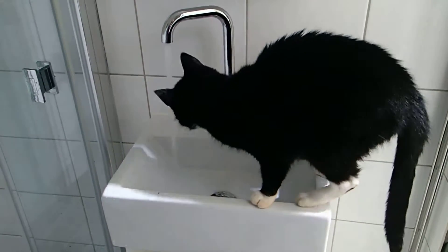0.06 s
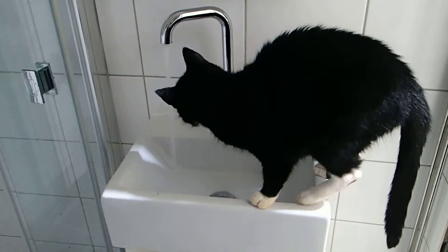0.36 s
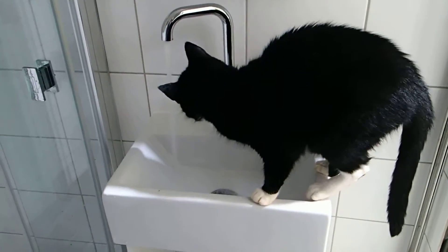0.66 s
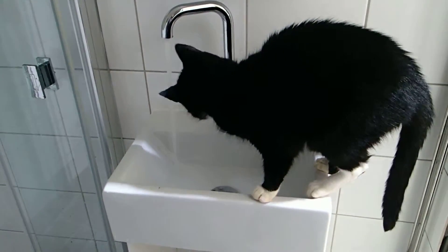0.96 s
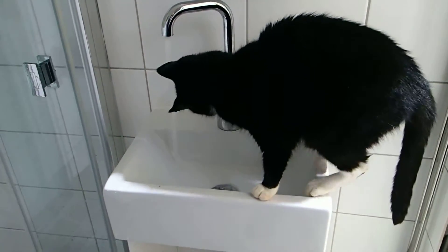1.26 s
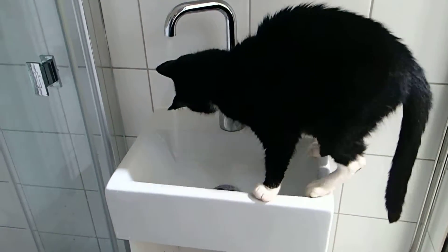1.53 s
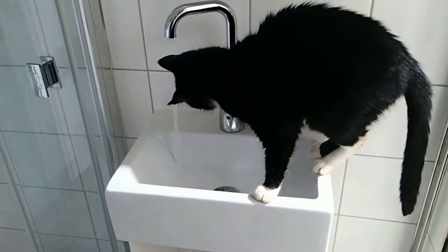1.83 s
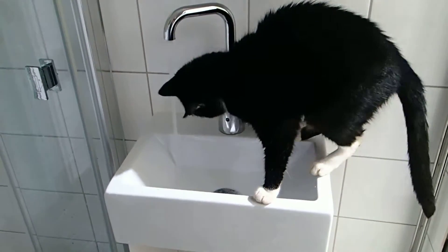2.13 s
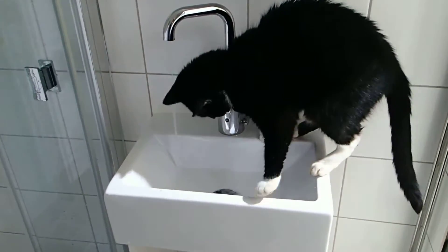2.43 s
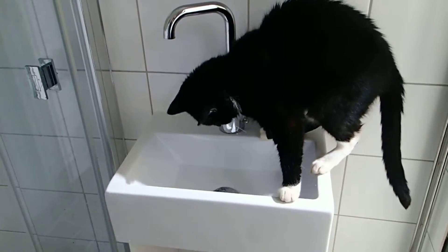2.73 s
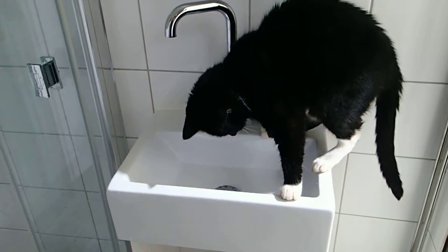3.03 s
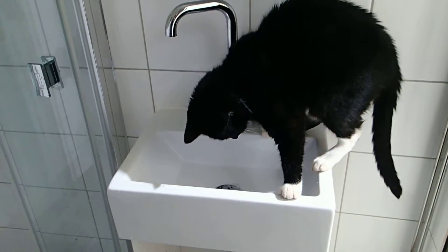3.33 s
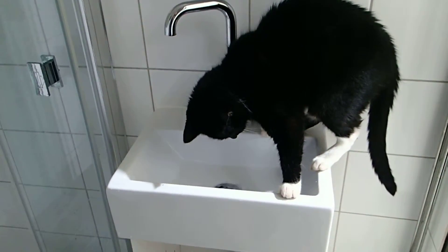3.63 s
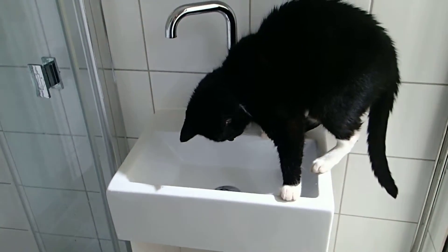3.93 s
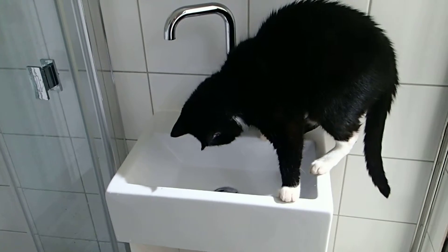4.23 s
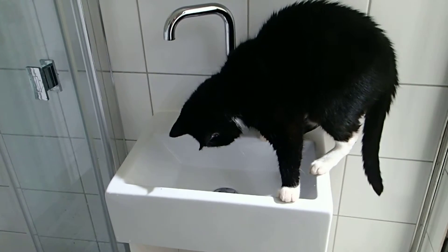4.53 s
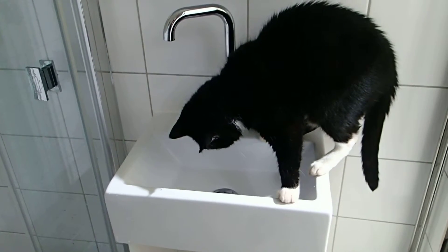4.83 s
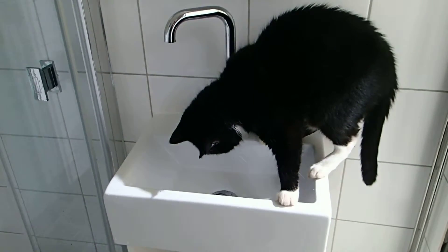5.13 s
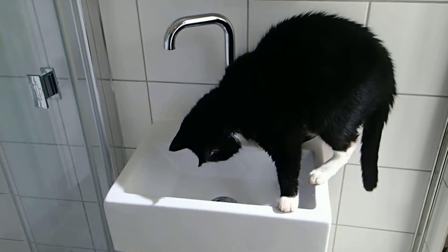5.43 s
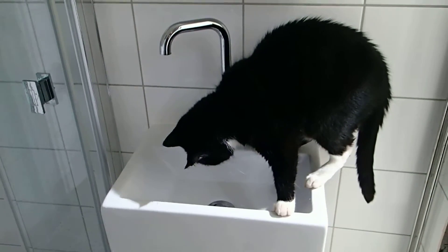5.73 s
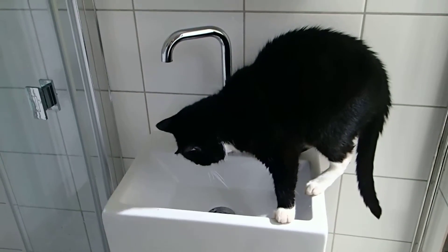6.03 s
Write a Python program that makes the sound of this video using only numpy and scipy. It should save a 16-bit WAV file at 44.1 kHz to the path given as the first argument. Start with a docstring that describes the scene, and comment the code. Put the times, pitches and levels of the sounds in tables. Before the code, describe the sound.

In a small tiled bathroom, a nearby faucet sprays and spits into a basin, over a couple of barely audible paw bumps. The valve closes with a low thud before the halfway point and the water cuts off. What remains is much quieter: a faint hollow gulp from the drain, foam popping, a few drops ringing on porcelain and some light ticks near the end.

```python
"""Bathroom tap, shut off

An aerated jet spatters and spits into a small porcelain basin in a tiled bathroom, while a cat's
paws bump softly on the rim. The valve shuts with a dull thud and the stream dies. Foam pops and
crackles as the last water slips down the hollow drain, and a few drops ring the basin."""
import sys
import numpy as np
from scipy import signal
from scipy.fft import rfft, irfft, next_fast_len
from scipy.io import wavfile

SR = 44100
rng = np.random.default_rng(int(sys.argv[2]) if len(sys.argv) > 2 else 0)


def unload_wav(signal):
    """Save mono or channel-first audio to the path in sys.argv[1] as 16-bit WAV at rate SR, clipped to [-1, 1]."""
    wavfile.write(
        sys.argv[1],
        SR,
        np.round(np.clip(np.atleast_2d(signal).T, -1, 1) * 32767).astype(np.int16),
    )


N = 268128
TIME = np.arange(N) / SR
FFT_SIZE = next_fast_len(N + SR)
FREQS = np.maximum(np.arange(FFT_SIZE // 2 + 1) * SR / FFT_SIZE, 1)
CLOSING_S, SHUT_S = 2.34, 2.498  # the valve starts to throttle, then seats

# Sources are built as mid/side pairs. Table levels are relative: each layer adds its own gain.
# Tone of water spattering on porcelain: freq_hz, level_db
SPATTER_EQ = [(1500, -31.5), (2300, -24.5), (3000, -18), (3400, -18.5), (4300, -12.5), (5100, -9.5),
              (6250, 1), (6900, -1.5), (8000, -0.5), (8700, -4.5), (10200, -8), (13000, -5), (14200, -10.5),
              (15500, -15)]
# Air pockets spitting in the jet at set moments: start_s, level_db
AIR_SPITS = [(0.063, -5), (0.174, -1.5), (0.194, -8), (0.2451, -4), (0.33, -17), (0.404, -5), (0.64, -8),
             (0.9296, -7), (1.4441, -0.5), (1.559, 0), (1.748, -9), (1.8513, -11), (1.918, -10),
             (2.0413, -7), (2.0792, -6), (2.3966, -16)]
def jet(level_db=-1.16, impact_db=-4.0, flutter_db=1.76, snap_db=-13.0, spit_db=9.0, wobble_db=0.56):
    """Tiny impacts and bursting bubbles come in flurries; droplets snap and air pockets spit on top."""
    flow_db = flow_level() + wobble_db * drift(per_s=10.9)
    bursting = fizz(per_s=8000, spread_db=4.0, width_hz=1270)
    impacts = from_db(impact_db) * grains(per_s=7400, spread_db=6.5)
    flutter = from_db(flutter_db * np.clip(drift(per_s=170), -2, 2))
    flurries = unit_rms((bursting + impacts) * flutter)
    snaps = from_db(snap_db) * grains(per_s=40, spread_db=1.9)
    out = (flurries + snaps) * from_db(flow_db + level_db)
    envelope = burst(rise_s=0.014, t60_s=0.032, count=SR // 25)
    for s, db in AIR_SPITS + chance_spits():
        spit = grains(per_s=10000, spread_db=-1.0, count=len(envelope)) * envelope
        add(out, s, from_db(db + spit_db) * unit_energy(spit))
    low_cut = signal.butter(2, 190, "high", fs=SR, output="sos")
    return signal.sosfilt(low_cut, coloured(out, SPATTER_EQ))

def flow_level(open_db=-21, thin_s=1.97, thin_db=4.5, closing_db_per_s=33, shut_db_per_s=327):
    """Level of the stream in dB: steady, briefly thinner, throttled, then shut."""
    thinning = thin_db * np.exp(-((TIME - thin_s) / 0.043) ** 2)
    closing = closing_db_per_s * np.clip(TIME - CLOSING_S, 0, 1)
    shut = shut_db_per_s * np.clip(TIME - SHUT_S, 0, 1)
    return open_db - thinning - closing - shut

def fizz(per_s, spread_db, width_hz):
    """Tiny bubbles burst all over the treble, each ringing a few cycles at one of many pitches."""
    out, bursts = 0, grains(per_s, spread_db)
    pitches_hz = np.linspace(1500, 15500, num=18)
    pitch_index = rng.integers(len(pitches_hz), size=N)
    for k, hz in enumerate(pitches_hz):
        resonance = signal.iirpeak(hz, hz / width_hz, fs=SR)
        out = out + signal.lfilter(*resonance, bursts * (pitch_index == k) + 1e-18)
    return unit_rms(out)

def chance_spits(level_db=-11.0, range_db=4.0, count=20):
    """More air pockets spit at loose intervals while the tap is open: start_s, level_db."""
    return [((k + jitter) / count * CLOSING_S, level_db + range_db * size)
            for k, (jitter, size) in enumerate(rng.random((count, 2)))]

# Prominent bubbles trapped under the jet: start_s, level_db, pitch_hz
ACCENT_BUBBLES = [(0.046, -20.5, 3016), (0.46, -25, 2920), (1.1063, -22, 2910), (1.5374, -24, 3560),
                  (1.8518, -22, 2620), (2.021, -26, 3000)]
def bubbles(level_db=-2.0, t60_s=0.025, rise_per_s=2.6):
    """Trapped bubbles chirp briefly, rising in pitch as they near the surface."""
    out, t = np.zeros((2, N)), TIME[:SR // 15]
    medium = chance_bubbles(level_db=-11.0, low_hz=2670, high_hz=3400, count=16)
    faint = chance_bubbles(level_db=-15.0, low_hz=2400, high_hz=5460, count=100)
    for s, db, hz in ACCENT_BUBBLES + medium + faint:
        chirp = np.sin(2 * np.pi * hz * t * (1 + rise_per_s * t / 2)) * fade(t60_s, len(t))
        add(out, s, from_db(db + level_db) * chirp)
    return out

def chance_bubbles(level_db, low_hz, high_hz, count, range_db=6.0):
    """Scattered bubbles, as loud as the flow is strong: start_s, level_db, pitch_hz."""
    jitter, size, pitch = rng.random((count, 3)).T
    start_s = (np.arange(count) + jitter) / count * SHUT_S
    db = np.interp(start_s, TIME, flow_level()) + level_db + range_db * size
    return list(zip(start_s, db, low_hz * (high_hz / low_hz) ** pitch))

# Ringing modes of the porcelain: pitch_hz, level_db, t60_s
BASIN_MODES = [(1710, -5.5, 0.059), (2750, -1.5, 0.028), (3530, -5, 0.051), (4300, 1, .03),
               (5800, -10, .03), (6130, -3, 0.027), (7200, 4.5, 0.028), (7820, 2, 0.024)]
# Tone of a drop's splash: freq_hz, level_db
SPLASH_EQ = [(30, -16), (120, 0), (400, -8), (700, 0.5), (1200, -9.5), (2500, -10.5), (5000, 1), (7200, 6),
             (10000, -5.5), (13500, -12), (15500, -18)]
# Drops hitting the basin: start_s, splash_db, ring_db, knock_db, treble_db
DROP_HITS = [(3.433, -21.5, -24.5, -43.5, -4), (3.713, -27.5, -50, -47.5, 8), (5.722, -30, -26.5, -57, 2)]
def drops(ring_gain_db=11.5, splash_gain_db=18.0, knock_gain_db=31.5):
    """A drop splashes, sets the porcelain ringing and knocks the hollow of the bowl."""
    out, splashes = np.zeros((2, N)), np.zeros((2, N))
    treble = signal.butter(2, 9000, "high", fs=SR, output="sos")
    knock = unit_energy(ring(hz=426, t60_s=0.024) * attack(0.012))
    envelope = burst(rise_s=0.006, t60_s=0.025, count=SR // 10)
    for s, splash_db, ring_db, knock_db, treble_db in DROP_HITS:
        modes = sum(from_db(db + rng.standard_normal((2, 1))) * ring(hz, t60_s)
                    for hz, db, t60_s in BASIN_MODES)
        add(out, s, from_db(ring_db + ring_gain_db) * unit_energy(modes))
        add(out, s, from_db(knock_db + knock_gain_db) * knock)
        spray = unit_energy(grains(per_s=12000, spread_db=7.0, count=len(envelope)) * envelope)
        spray = spray + (from_db(treble_db) - 1) * signal.sosfiltfilt(treble, spray)  # high shelf
        add(splashes, s, from_db(splash_db + splash_gain_db) * spray)
    return out + coloured(splashes, SPLASH_EQ)

# Clusters of foam bursting at set moments: start_s, level_db, pitch_hz, width_hz
FOAM_POPS = [(2.638, -44, 6600, 1600), (2.701, -44, 7540, 2400), (2.8, -51, 3530, 550),
             (2.836, -48, 6200, 1200), (2.9, -43, 6400, 2610), (2.925, -56, 1940, 250.3),
             (3.058, -43.5, 6230, 900), (3.072, -37.5, 8000, 1780), (3.26, -53, 1295, 220),
             (3.433, -38, 4350, 500), (3.538, -49.5, 3620, 202), (3.708, -46, 7600, 1620),
             (4.334, -50, 12500, 3240), (4.5, -47.5, 5900, 1210), (4.68, -49, 6500, 1920),
             (5.295, -48.5, 4730, 700), (5.404, -42.5, 8260, 2200), (5.544, -44, 6900, 3640),
             (5.646, -48, 8800, 2000)]
def foam(level_db=32.5, mist_db=-8.0, mist_hz=12600, mist_width_hz=2300, fine_hz=8000):
    """Foam bursts in clusters; the set ones throw a bright mist, more of it the finer their bubbles."""
    large = chance_pops(level_db=-15.0, low_hz=1700, high_hz=3670, width_share=0.22, count=16)
    medium = chance_pops(level_db=-5.5, low_hz=5550, high_hz=7250, width_share=0.21, count=28)
    tiny = chance_pops(level_db=-7.0, low_hz=9500, high_hz=13410, width_share=0.18, count=12)
    # The mist loses 30 dB for each octave its cluster lies below fine_hz.
    mist = [(s, db + mist_db - 30 * np.log2(max(fine_hz / hz, 1)), mist_hz, mist_width_hz)
            for s, db, hz, _ in FOAM_POPS]
    out = np.zeros((2, N))
    for s, db, hz, width_hz in FOAM_POPS + mist + large + medium + tiny:
        add(out, s, from_db(db + level_db) * pop_cluster(hz, width_hz))
    return out

def chance_pops(level_db, low_hz, high_hz, width_share, count, range_db=6.5, from_s=2.6, until_s=5.8):
    """Scattered clusters, as loud as the basin is wet: start_s, level_db, pitch_hz, width_hz."""
    jitter, size, pitch = rng.random((count, 3)).T
    start_s = from_s + (np.arange(count) + jitter) / count * (until_s - from_s)
    db = np.interp(start_s, *np.transpose(FILM_LEVEL)) + level_db + range_db * size
    hz = low_hz * (high_hz / low_hz) ** pitch
    return list(zip(start_s, db, hz, width_share * hz))

def pop_cluster(hz, width_hz, rise_s=0.013, t60_s=0.033, skirt_db=-13.0, count=SR // 8):
    """A quick run of clicks rings at the pitch of its bubbles, with a few strays around it."""
    edges_hz = np.clip([hz - width_hz / 2, hz + width_hz / 2], 100, SR * 0.45)
    bands = []
    for order in (2, 1):
        clicks = grains(per_s=4100, spread_db=4.0, count=count) * burst(rise_s, t60_s, count)
        band_pass = signal.butter(order, edges_hz, "band", fs=SR, output="sos")
        bands.append(signal.sosfilt(band_pass, clicks + 1e-18))
    core, skirt = bands
    return unit_energy(core + from_db(skirt_db) * skirt)

# The water film runs off, seeps, swells with a last runnel and dries: time_s, level_db
FILM_LEVEL = [(2.67, -43.5), (4.1, -54.5), (4.55, -51.5), (5.1, -53.5), (5.26, -47.5), (5.8, -62),
              (6.08, -63)]
# Tone of its crackle: freq_hz, level_db
FILM_EQ = [(900, -14.5), (2000, -8.5), (3500, -14), (4800, -2.5), (6200, 2.5), (8000, 0), (10000, -4),
           (13000, -3), (15500, -17)]
def film(level_db=-2.5, clump_db=3.0):
    """The thin film left in the basin crackles softly as it runs off."""
    crackle = unit_rms(grains(per_s=2500, spread_db=3.5) * from_db(clump_db * drift(per_s=30)))
    wetness_db = np.interp(TIME, *np.transpose(FILM_LEVEL))
    return from_db(wetness_db + level_db) * coloured(crackle, FILM_EQ)

# Thuds of the closing valve: start_s, level_db, pitch_hz, t60_s
VALVE_THUDS = [(2.244, -37.5, 262, 0.17), (2.306, -36, 275, 0.19), (2.314, -36.5, 101, 0.11),
               (2.347, -31.5, 130, 0.11), (2.35, -35.5, 327, 0.085)]
def valve(side_db=-22.0, rumble_db=-10.5):
    """Dull thuds run through tap and basin as the flow is shut off, and rumble on in the room."""
    out, rumble = np.zeros((2, N)), np.zeros((2, N))
    envelope = burst(rise_s=0.025, t60_s=0.53, count=SR // 2)
    for s, db, hz, t60_s in VALVE_THUDS:
        add(out, s, from_db(db) * ring(hz, t60_s) * attack(0.013) * from_db([[0], [side_db]]))
        add(rumble, s, from_db(db + rumble_db) * rng.standard_normal((2, len(envelope))) * envelope)
    return out + coloured(rumble, [(40, -21), (110, 0), (320, -7), (700, -16), (3000, -43)])

# Close, dry ticks: start_s, level_db
DRY_TICKS = [(5.0893, -35), (5.3403, -29.5), (5.353, -33), (5.4745, -28.5)]
def ticks(level_db=11.0, t60_s=0.029, count=SR // 40):
    """Fast-dying puffs of noise make tiny dry taps with a soft body."""
    out = np.zeros((2, N))
    for s, db in DRY_TICKS:
        tick = unit_energy(rng.standard_normal((2, count)) * fade(t60_s, count))
        add(out, s, from_db(db + level_db) * tick)
    body_eq = [(40, 4), (150, 12), (400, 8), (1200, -4), (3000, -7), (6500, -5),
               (10000, -12), (15000, -22)]
    return coloured(out, body_eq)

# Hollow tone of the waste pipe: freq_hz, level_db
PIPE_EQ = [(30, -32), (70, -13), (135, 0.5), (210, -3.5), (390, -6), (450, 5), (510, -11.5), (900, -12.5),
           (1500, -22), (3000, -52)]
# Ring of the pipe's mouth: freq_hz, level_db
MOUTH_EQ = [(60, -27), (200, -13), (370, -11.5), (450, 0.5), (520, -19), (1000, -23), (3000, -45)]
# Gulps as water lets go down the pipe: crest_s, level_db
DRAIN_GULPS = [(1.63, -48), (2.49, -48), (2.84, -52.5)]
def drain(trickle_db=-65.5, dry_up_db_per_s=12, rise_db_per_s=110, fall_db_per_s=44):
    """A trickle stirs the pipe's air column, dying once the tap is shut; gulps ring the pipe's mouth."""
    flow = from_db(trickle_db - dry_up_db_per_s * np.maximum(TIME - SHUT_S, 0))
    gulps = sum(from_db(db - np.maximum(rise_db_per_s * (s - TIME), fall_db_per_s * (TIME - s)))
                for s, db in DRAIN_GULPS)
    trickle = unit_rms(grains(per_s=2200, spread_db=-2.5) * from_db(2.0 * drift(per_s=24)))
    glugs = unit_rms(grains(per_s=3000, spread_db=1.5) * from_db(3.5 * drift(per_s=26)))
    return flow * coloured(trickle, PIPE_EQ) + gulps * coloured(glugs, MOUTH_EQ)

# Soft bumps, as of a cat shifting its paws on the rim: start_s, level_db
PAW_STEPS = [(0.14, -44), (1.19, -43.5)]
def paws(pitch_hz=138, rise_s=0.03, t60_s=0.25):
    """A padded step makes the basin boom faintly, dead centre."""
    out = np.zeros((2, N))
    for s, db in PAW_STEPS:
        add(out[:1], s, from_db(db) * ring(pitch_hz, t60_s) * attack(rise_s))
    return out

# Tone of the room's still air: freq_hz, level_db
ROOM_TONE_EQ = [(25, -20), (50, -7), (90, -2.5), (170, 0.5), (400, -2), (700, -6.5), (1500, -11),
                (3000, -16), (6000, -17.5), (10000, -20.5), (15500, -20)]
def room_tone(level_db=-50.0, side_db=3.0):
    """The air of the room lays a soft, steady bed of noise."""
    noise = coloured(rng.standard_normal((2, N)), ROOM_TONE_EQ)
    return from_db(level_db) * noise * from_db([[0], [side_db]])

def bathroom(dry, early_db, tail_db):
    """The point where the water lands wanders, so the sound shifts between two patterns of echoes."""
    blend = np.pi / 4 + drift(per_s=7)
    out = dry
    for share in (np.cos(blend), np.sin(blend)):
        echoes = tile_echoes(early_db, tail_db)
        out = out + signal.fftconvolve(dry * share, echoes, axes=1)[:, :N]
    return out / np.sqrt(1 + np.sum(echoes ** 2) / 2)

def tile_echoes(early_db, tail_db, early_t60_s=0.089, tail_t60_s=0.33, count=SR // 2):
    """Sparse first echoes come off bowl and tiles, then a dense, duller tail."""
    reflections = grains(per_s=1200, spread_db=1.5, count=count) * fade(early_t60_s, count)
    early = unit_energy(reflections * (TIME[:count] > 0.0012))  # pre-delay
    tail = unit_energy(rng.standard_normal((2, count)) * burst(0.036, tail_t60_s, count))
    high_cut = signal.butter(1, 11000, fs=SR, output="sos")
    return from_db(early_db) * early + from_db(tail_db) * signal.sosfilt(high_cut, tail)

def from_db(db):
    """Decibels to gain."""
    return 10 ** (np.asarray(db) / 20)

def unit_rms(x):
    """Scale to rms 1."""
    return x / np.sqrt(np.mean(x ** 2) + 1e-20)

def unit_energy(x):
    """Scale a short sound to an average energy of 1 a channel."""
    return unit_rms(x) / np.sqrt(x.shape[-1])

def over_hz(points):
    """A curve at every frequency, its points joined on a log axis."""
    hz, value = np.transpose(points)
    return np.interp(np.log(FREQS), np.log(hz), value)

def coloured(x, eq):
    """Minimum-phase EQ through points of freq_hz, level_db; keeps the power of white noise."""
    gain = unit_rms(from_db(over_hz(eq)))
    cepstrum = irfft(np.log(gain), FFT_SIZE)
    cepstrum[1:FFT_SIZE // 2] *= 2
    cepstrum[FFT_SIZE // 2 + 1:] = 0
    return irfft(rfft(x, FFT_SIZE) * np.exp(rfft(cepstrum)), FFT_SIZE)[:, :N]

def drift(per_s):
    """Smooth random modulation of rms 1, heading for a new value per_s times a second."""
    return unit_rms(np.interp(TIME * per_s, np.arange(4096), rng.standard_normal(4096)))

def grains(per_s, spread_db, count=N):
    """Random clicks of uneven size, each with its own polarity in mid and side."""
    hits = rng.random(count) < per_s / SR
    sizes = from_db(spread_db * np.minimum(rng.exponential(1, count), 3.5))
    return unit_rms(hits * sizes * rng.choice([-1, 1], (2, count)))

def fade(t60_s, count):
    """A decay that loses 60 dB in t60_s."""
    return 1000 ** (-TIME[:count] / t60_s)

def attack(rise_s, count=SR // 3):
    """A soft onset, all but complete after rise_s."""
    return 1 - fade(rise_s, count)

def burst(rise_s, t60_s, count):
    """An envelope that swells and dies."""
    return attack(rise_s, count) * fade(t60_s, count)

def ring(hz, t60_s, count=SR // 3):
    """One struck mode."""
    return np.sin(2 * np.pi * hz * TIME[:count]) * fade(t60_s, count)

def add(out, start_s, sound):
    """Mix a short sound in at start_s."""
    i = int(start_s * SR)
    out[:, i:i + sound.shape[-1]] += sound[..., :N - i]

def to_stereo(x, width):
    """Mid and side become left and right; width sets side against mid: freq_hz, side_db."""
    side_gain = from_db(over_hz(width))
    mid, side = rfft(x, FFT_SIZE) / np.sqrt(1 + side_gain ** 2)
    return irfft(np.array([mid + side_gain * side, mid - side_gain * side]), FFT_SIZE)[:, :N]

# Stereo width of everything at the basin: freq_hz, side_db
BASIN_WIDTH = [(400, -10), (1000, -14), (2000, -43), (3600, -16.5), (5500, -8.5), (8000, -8), (11000, -6.5),
               (15000, -9)]
def scene():
    """The jet is up front; the small sounds down in the bowl arrive mostly by way of the tiles."""
    stream = bathroom(jet() + bubbles(), early_db=-6.0, tail_db=-2.0)
    bowl = bathroom(film() + foam() + drops(), early_db=0.5, tail_db=6.0)
    basin = to_stereo(stream + bowl + drain() + valve() + paws() + ticks(), BASIN_WIDTH)
    return basin + to_stereo(room_tone(), [(50, -2.5), (300, -4.5), (2000, -4.5), (8000, -3.5)])

# Balance of the two microphone ports: freq_hz, left_over_right_db
MIC_BALANCE = [(2000, -0.5), (3400, -4), (5000, -5.5), (6200, -9.5), (7000, -0.5), (7900, 4), (8700, 6.5),
               (10800, 3), (12000, 2.5), (13100, -21), (15000, 9)]
# Phase between the ports: freq_hz, left_lead_rad
MIC_PHASE = [(4900, 0.016), (6000, 0.81), (7250, 1.55), (8500, 0.28), (9400, -0.12), (10700, -0.33),
             (11600, -1.4), (12400, -0.7), (13400, 0.36), (14500, 0.69)]
def record(dry, notch_hz=4030, notch_width_hz=380, notch_depth=0.88, cutoff_hz=15750):
    """Each port colours and delays the treble its own way; both share a narrow notch; the top is cut."""
    lean = from_db(over_hz(MIC_BALANCE) / 2) * np.exp(0.5j * over_hz(MIC_PHASE))
    ports = np.array([lean, 1 / lean])
    ports = ports / np.sqrt(np.mean(np.abs(ports) ** 2, axis=0))
    picked_up = irfft(rfft(dry, FFT_SIZE) * ports, FFT_SIZE)[:, :N]
    notch_band = signal.iirpeak(notch_hz, notch_hz / notch_width_hz, fs=SR)
    notched = picked_up - notch_depth * signal.lfilter(*notch_band, picked_up)
    brick_wall = 1 / np.sqrt(1 + (FREQS / cutoff_hz) ** 600)
    return irfft(rfft(notched, FFT_SIZE) * brick_wall, FFT_SIZE)[:, :N]

dry = scene()
out = record(dry)
unload_wav(out)
```